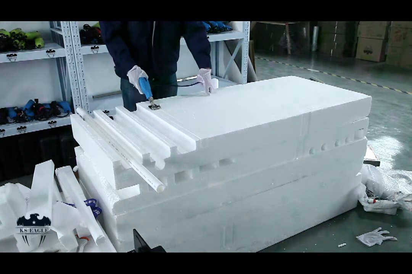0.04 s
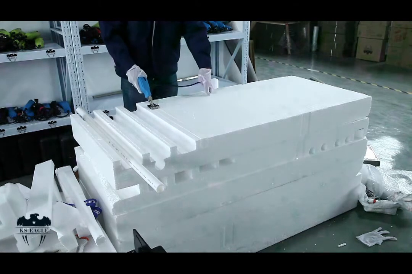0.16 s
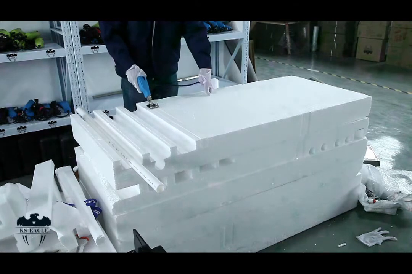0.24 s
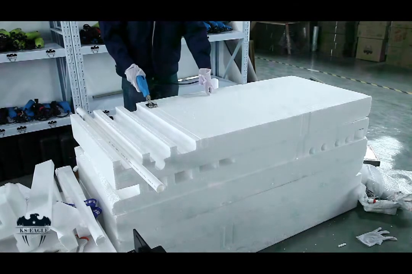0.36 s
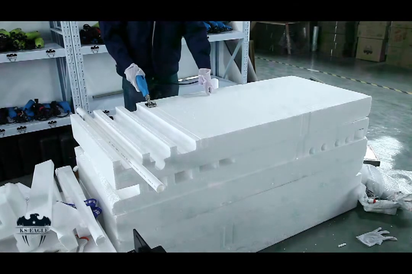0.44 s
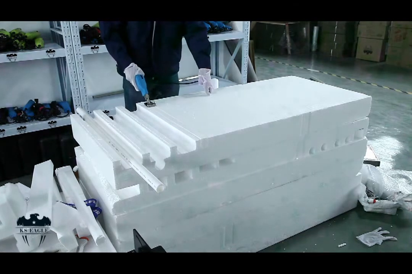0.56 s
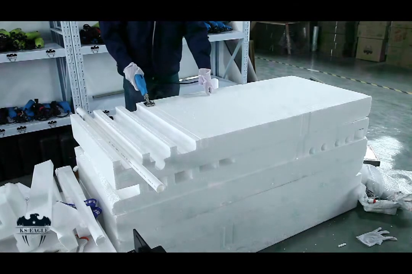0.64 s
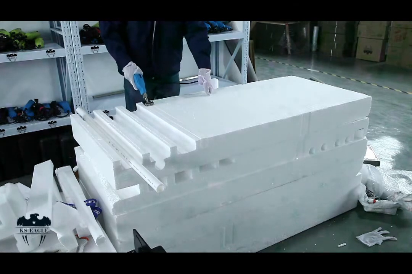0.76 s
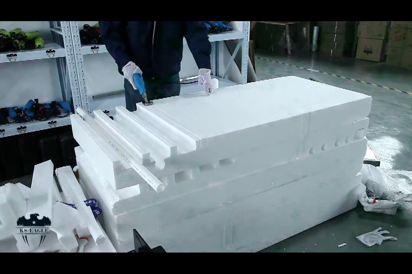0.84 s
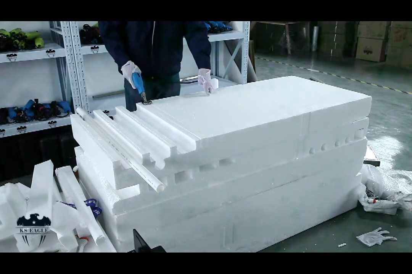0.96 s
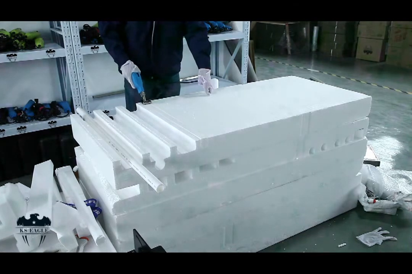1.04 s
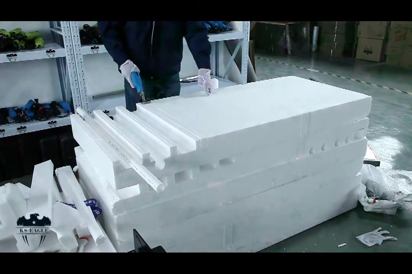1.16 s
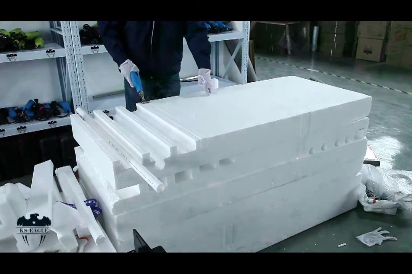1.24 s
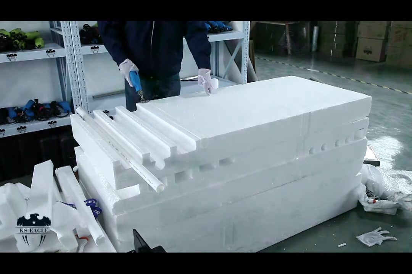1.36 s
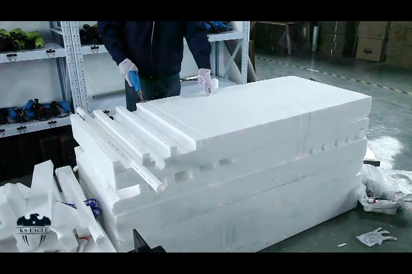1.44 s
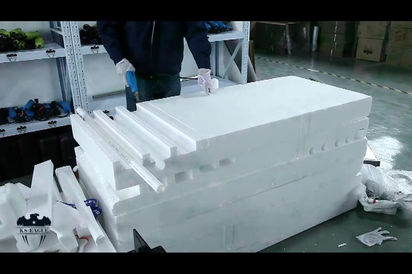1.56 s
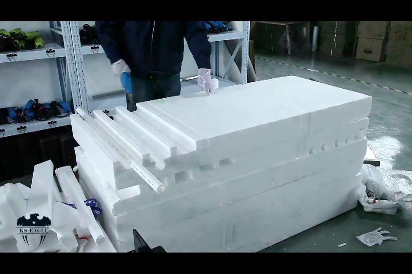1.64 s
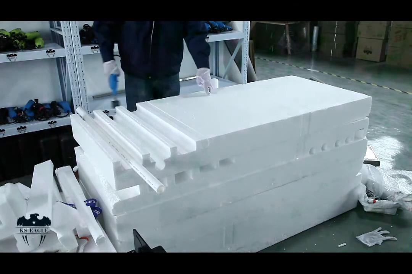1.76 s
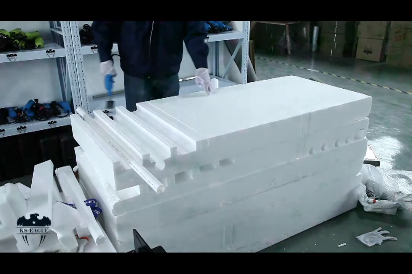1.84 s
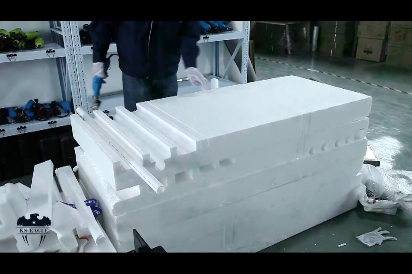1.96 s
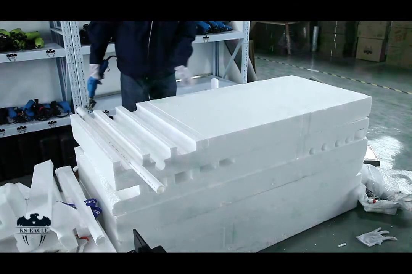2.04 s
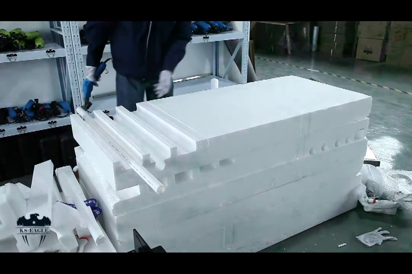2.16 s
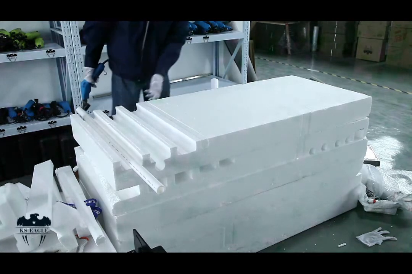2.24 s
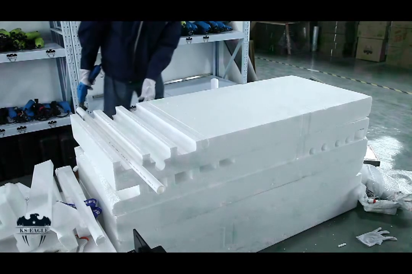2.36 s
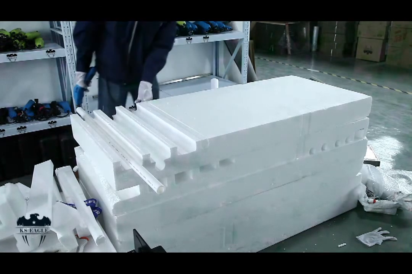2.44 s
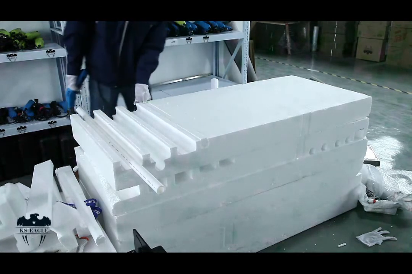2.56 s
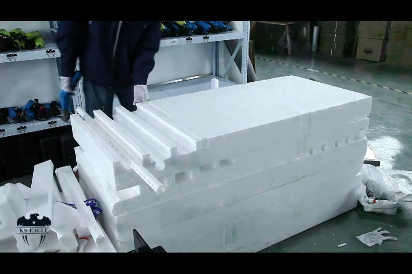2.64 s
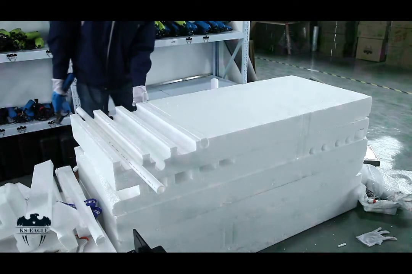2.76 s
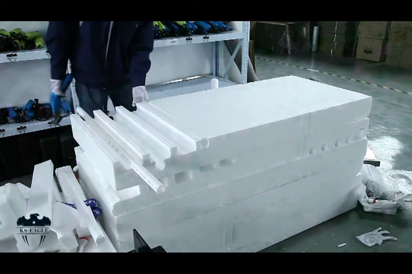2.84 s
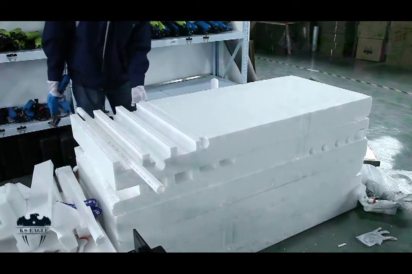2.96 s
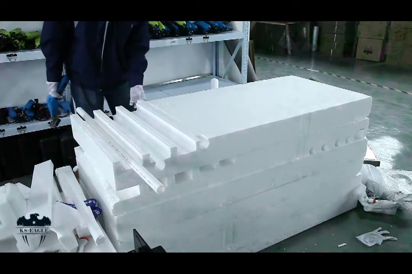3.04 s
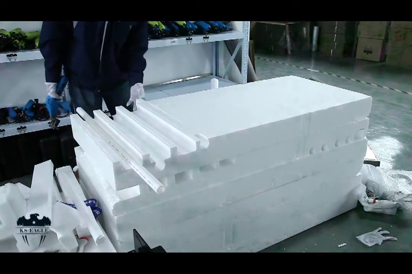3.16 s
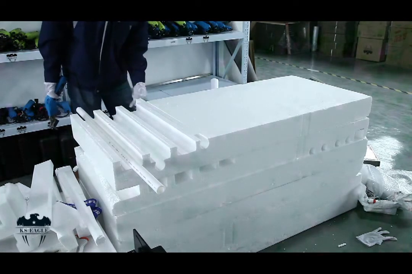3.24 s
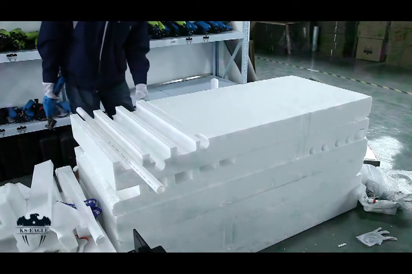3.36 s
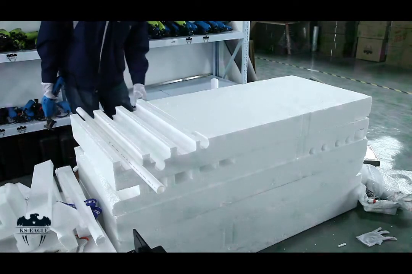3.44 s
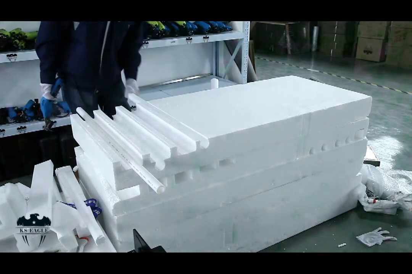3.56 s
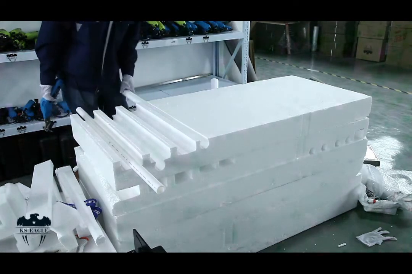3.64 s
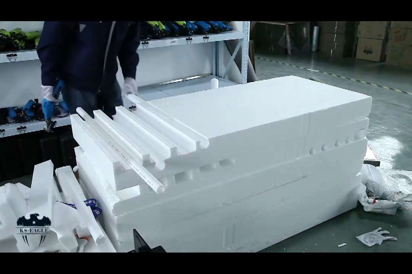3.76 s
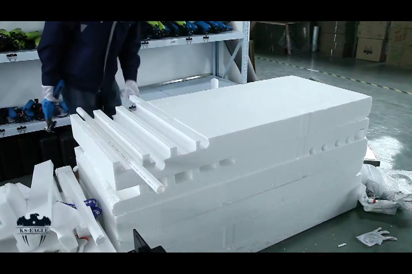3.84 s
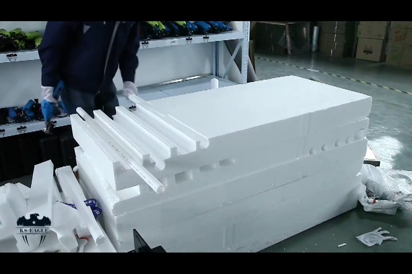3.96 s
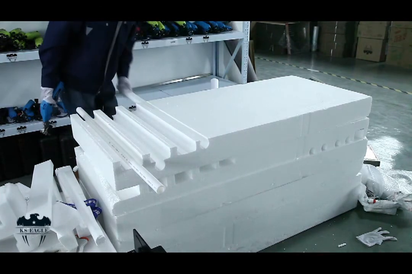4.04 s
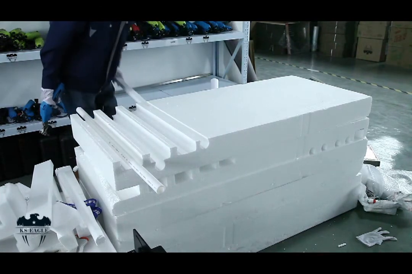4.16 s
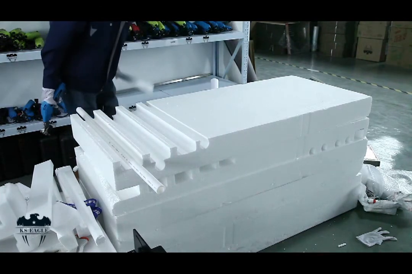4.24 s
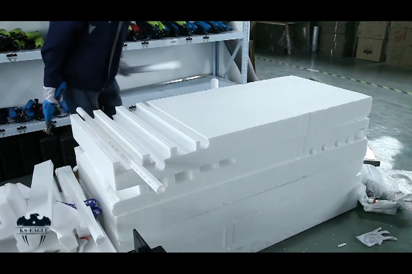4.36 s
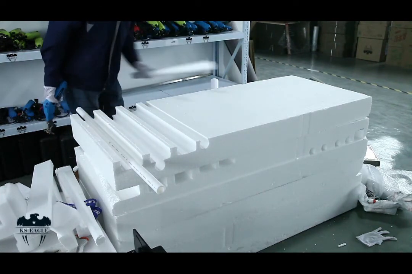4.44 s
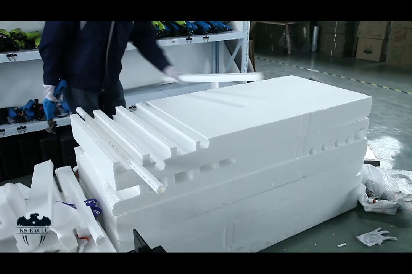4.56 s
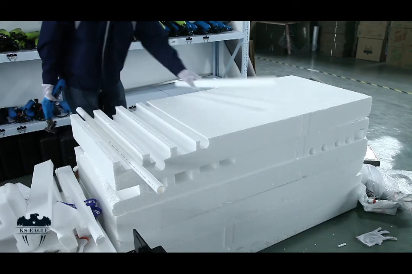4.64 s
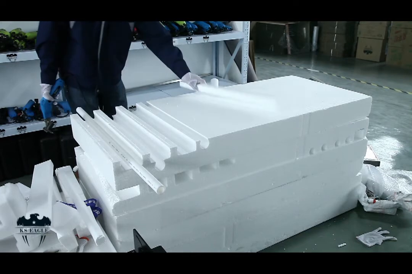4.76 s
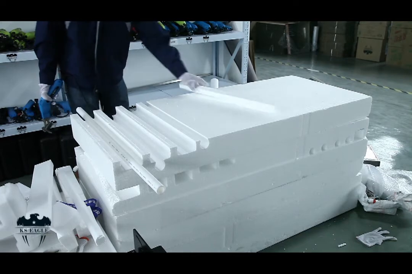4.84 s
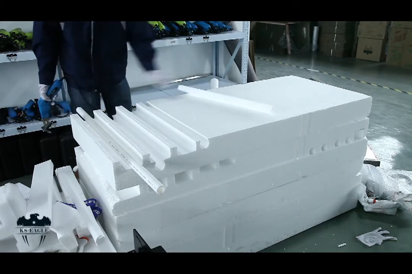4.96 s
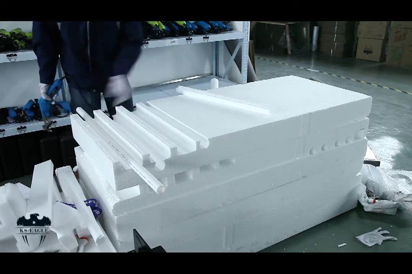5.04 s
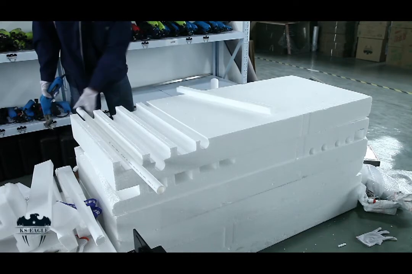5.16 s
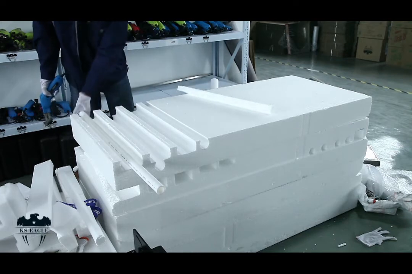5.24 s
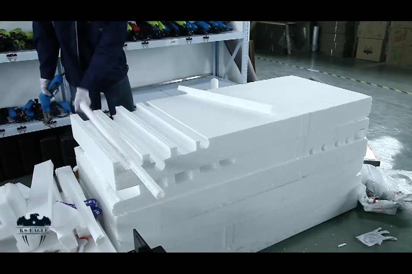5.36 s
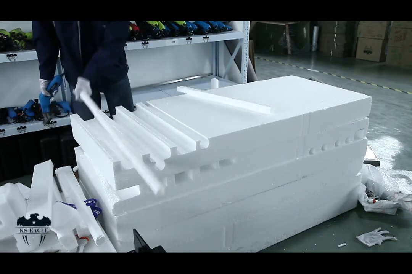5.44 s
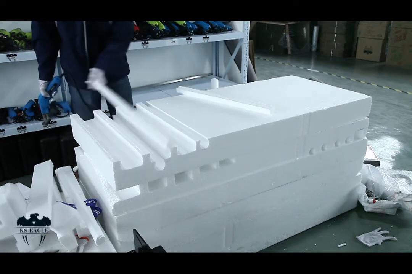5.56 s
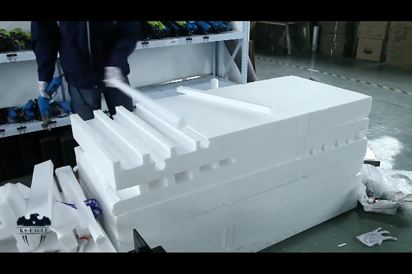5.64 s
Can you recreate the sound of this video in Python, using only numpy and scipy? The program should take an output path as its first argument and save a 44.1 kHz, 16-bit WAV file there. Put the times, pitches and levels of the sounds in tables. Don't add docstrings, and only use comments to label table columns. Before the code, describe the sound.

A hot blade cuts polystyrene with a thin sizzle, breathy whistle and small snags, slightly sped up. Sharp cracks and a squeak mark its exit, then the tool is set down with a soft knock. After faint rustles, a strip is pulled free in three loud, squeaky, crackling rasps. It drops and bounces lightly on the block; a glove brushes another. Hissy, reverberant warehouse, microphone fairly near, identical channels.

```python
import sys
import numpy as np
from scipy import signal
from scipy.fft import rfft, irfft
from scipy.io import wavfile
from scipy.ndimage import uniform_filter1d

SR = 44100
rng = np.random.default_rng(int(sys.argv[2]) if len(sys.argv) > 2 else 0)


def inscribe(sig):
    pcm = np.round(np.clip(np.atleast_2d(sig).T, -1, 1) * 32767)
    wavfile.write(sys.argv[1], SR, pcm.astype(np.int16))


def nominal_scale(level):
    x = np.asarray(level, float) / 20
    return 10 ** x


N = 251811
T = np.arange(N) / SR
SPLICE_S, FAST = 1.538, 1.605

# (frequency [Hz], level [dB rms])
HUM_LINES = [(150.7, -76), (301.5, -94.5), (656.8, -84.5)]
# (frequency [Hz], density [dB per Hz])
HALL_HISS = [(15, -79), (25, -13), (96, -5), (152, 0), (342, -2), (555, -6.5), (653, -6), (708, -7),
             (1430, -11.5), (3570, -10), (6280, -6.5), (7190, -13.5), (13000, -26), (15700, -29)]
HALL_HISS_DB = -67.5
# (frequency [Hz], t60 [s])
HALL_T60 = [(100, 0.97), (300, 1), (700, 0.76), (2000, 0.84), (6000, 0.6), (14000, 0.41)]
# (frequency [Hz], level [dB])
HALL_WET = [(100, 8.5), (2000, 3), (4000, 6.5), (6500, -7.5), (14000, 6)]

# (time [s], sizzle level [dB])
KNIFE_FEED = [(0.0, -54), (0.132, -54.5), (1.336, -54), (1.43, -50.5), (1.44, -59), (1.462, -60),
              (1.538, -57)]
# (frequency [Hz], density [dB per Hz])
SIZZLE_COLOUR = [(1760, -20.5), (3000, -8.5), (3240, -16), (3590, -6.5), (5520, -7.5), (9880, 0),
                 (11300, -0.5), (14600, -5.5), (15700, -16)]
# (time [s], centre [Hz])
JET_PATH = [(0, 10600), (.3, 11700), (.62, 10700), (.9, 10500), (1.14, 12000), (1.25, 9600), (1.538, 10400)]
JET_DB, JET_WIDTH_HZ = -3, 1500
# (frequency [Hz], density [dB per Hz])
GROOVE_COLOUR = [(180, -39), (300, -21), (380, -7.5), (427, -33), (498, -14), (645, -16), (1340, -11.5),
                 (5000, -7.5), (6500, -8.5), (11000, -120)]
# (multiple of the pitch, width [Hz], level [dB])
GROOVE_OVERTONES = [(1, 148, -1), (1.38, 225, -15)]
GROOVE_HZ, GROOVE_SAG_HZ_PER_S2, LEAVES_S = 1450, 100, 1.43
GROOVE_FULL_DB, GROOVE_START_DB, GROOVE_DEEPENS_S = -57, -10, 0.23
# (frequency [Hz], width [Hz], level [dB], strongest at [s])
GAP_WHISTLES = [(1170, 52, 0, .75), (1870, 125, 2, 1), (2280, 180, -4.5, 1.1), (2840, 156, 1.5, 1.25),
                (3160, 190, -3.5, 1.1), (3840, 140, -8, 1.7)]
GAP_DB, GAP_DB_PER_S = -60, 14
WHISTLE_PATCHY_DB, WHISTLE_PATCH_HZ = 0.8, 9.0
# (peak [s], level [dB], rise [s], fall [s], groove relative [dB])
SHOVES = [
    (.005, -56.5, 0.018, 0.086, -6),
    (.06, -58, 0.026, 0.017, -26),
    (.108, -56, 0.011, 0.014, -29),
    (.44, -53, 0.027, 0.049, -36),
    (1.431, -72, 0.0031, 0.037, -18),
    (1.455, -39, 0.016, 0.0042, -32),
    (1.4675, -33.5, 0.0035, 0.0096, -15),
    (1.49, -56.5, 0.016, 0.067, 5.5),
    (1.515, -47.5, 0.046, 0.0066, -18),
    (1.5295, -44, 0.0096, 0.012, -18),
]
# (time [s], peak [dB], t60 [s], groove relative [dB])
SNAGS = [(0.015, -34, 0.0072, -19), (0.027, -32, 0.016, -21), (0.0605, -45, 0.009, -24),
         (0.1036, -35, 0.037, -23.5), (0.432, -29.5, 0.022, -23), (1.436, -21, 0.008, -44),
         (1.4484, -30, 0.014, -44), (1.4534, -26, 0.014, -43), (1.4654, -57, 0.012, -18),
         (1.467, -23, 0.028, -45), (1.4834, -53, 0.012, -22), (1.501, -36, 0.0085, -9),
         (1.511, -42, 0.012, -24), (1.5279, -29, 0.012, -17)]
# (time [s], level [dB])
CRACKS = [
    (1.4363, -28),
    (1.4515, -30),
    (1.4543, -35),
    (1.468, -36),
    (1.4702, -22),
    (1.5295, -37),
]
# (start [s], end [s], first gap [s], last gap [s], level [dB])
STUTTERS = [
    (.0163, .0215, 0.001, .002, -36),
    (.0247, .0403, 0.0015, 0.0026, -35),
    (.0502, .0668, 0.0024, 0.0032, -37),
    (.1042, .1172, .002, .0017, -31.5),
    (.4183, .4246, .0062, .0062, -32),
    (.43, .4415, 0.0012, 0.0011, -32),
    (.4432, .4502, .0024, .0023, -32),
    (1.5012, 1.516, .004, 0.0033, -33),
]
# (frequency [Hz], level [dB], t60 [s])
BLADE_MODES = [(1500, -60, 0.1), (2300, -61, .08), (2790, -59, 0.11), (3300, -59, 0.08), (3080, -57, .12),
               (4030, -60, 0.054)]
BREAKOUT_S = 1.3

# (time [s], peak [dB], top of thud [Hz], t60 [s], floor thump relative [dB])
KNOCKS = [(0.495, -57, 284, 0.22, -5), (0.578, -70, 300, 0.067, -16), (1.466, -55.5, 1120, 0.29, 4),
          (1.7886, -50, 337, 0.11, -14), (2.549, -60, 302, 0.076, -2), (3.514, -50.5, 334, 0.21, -11),
          (3.846, -51, 310, 0.21, -36), (4.031, -49.5, 413, 0.23, -34), (4.759, -38.5, 970, 0.22, -34),
          (4.811, -38.5, 700, 0.058, -28), (4.889, -40, 740, 0.09, -30), (5.03, -49, 730, 0.044, -19),
          (5.277, -66, 192, 0.06, -3)]

# (frequency [Hz], density [dB per Hz])
SKIN_COLOUR = [(2060, -59.5), (3500, -7.5), (4800, -1.5), (6360, 5), (7200, 5), (8340, -2.5), (9190, -7.5),
               (10500, -24), (13600, -27), (22000, -120)]
# (frequency [Hz], density [dB per Hz])
BODY_COLOUR = [(90, -18), (150, -17), (350, -13), (600, -10.5), (950, -3.5), (1350, -5.5), (1850, -3.5),
               (2400, -3), (3400, -0.5), (4500, -17), (7700, -72.5)]
# (frequency [Hz], density [dB per Hz])
SHEEN_COLOUR = [(5880, -33), (10000, 3.5), (13500, -4), (14800, -14.5), (15700, -7.5)]
# (peak [s], level [dB], rise [s],
# fall [s], body relative [dB])
RUSTLES = [(1.541, -59, 0.016, 0.22, 1), (1.62, -56, 0.038, 0.23, -15), (1.8, -69.5, 0.026, 0.31, -4),
           (1.98, -71.5, 0.13, 0.029, -11), (2.04, -69, 0.058, 0.31, -32), (2.294, -66.5, 0.065, 0.17, -9),
           (2.755, -62.5, 0.0092, 0.16, -3.5), (2.79, -51.5, 0.03, 0.66, -28),
           (2.855, -56.5, 0.15, 0.0043, -2.5), (3.7, -49, 0.093, 0.08, -10.5),
           (3.774, -50.5, 0.057, 0.017, -15), (3.848, -45, 0.057, 0.03, -10.5),
           (4.148, -45, 0.012, 0.18, -11), (4.3, -60.5, 0.43, 1, -11), (4.596, -67, 0.0095, 0.011, -19),
           (4.72, -84, 0.014, .012, -24), (4.783, -53.5, 0.024, 0.033, 1), (4.82, -65, 0.022, 0.37, -14),
           (5.08, -72, 0.023, 0.18, -13), (5.15, -64.5, 0.082, 0.17, -7.5), (5.3, -63.5, 0.0098, 0.2, -2.5),
           (5.391, -60, 0.012, 0.02, -11), (5.585, -67, 0.29, 0.22, -8.5)]
RUSTLE_SHEEN_DB = -23
# (peak [s], level [dB], rise [s], fall [s], unused)
SLEEVE = [
    (1.542, -73, .004, 0.11, 0),
    (2.53, -71.5, 0.018, 0.11, 0),
    (5.26, -70, .04, .05, 0),
    (1.608, -61, .004, 0.016, 0),
    (1.93, -78.5, 0.5, 0.31, 0),
    (4.5, -77.5, 0.17, 0.54, 0),
    (5.1, -88, 0.2, .2, 0),
]
# (time [s], pressure as rasp level [dB])
PULLS = [
    [(2.85, -63), (2.862, -47.5), (2.912, -39.5), (2.945, -41.5), (2.965, -39.5), (3.008, -43.5),
     (3.058, -38), (3.088, -40.5), (3.119, -49.5)],
    [(3.388, -46), (3.398, -43), (3.486, -40.5), (3.498, -35.5), (3.53, -42), (3.59, -39), (3.652, -47),
     (3.662, -50), (3.68, -56)],
    [(3.875, -55), (3.92, -46.5), (3.95, -41.5), (4.02, -37.5), (4.04, -39), (4.125, -35.5), (4.14, -43),
     (4.17, -70)],
]
# (frequency [Hz], width [Hz], level over rasp [dB])
PULL_RINGS = [
    [(920, 85, -25), (1750, 130, -7), (1900, 490, -4), (2450, 110, -7), (6190, 160, 14.5)],
    [(930, 110, -14), (1190, 97, -8), (1680, 83, -1), (2390, 49, -12), (4360, 320, -9)],
    [(930, 81, -7.5), (1150, 24, -6), (2030, 230, -17), (3160, 91, -29), (7200, 160, 4)],
]
PULL_SHEEN_DB = (-11.5, -14.5, -10)
SHEEN_PER_DB, FIRM_DB = 0.4, -36.5
PULL_BODY_DB, BODY_PER_DB = -14, -0.1
# (time [s], peak [dB], t60 [s], body relative [dB])
SLIPS = [(1.605, -36, 0.03, -23), (1.791, -62, 0.049, -31), (2.4917, -53, 0.038, -28),
         (2.519, -43, 0.028, -14), (2.5277, -45.5, 0.041, -13.5), (2.539, -43, 0.037, -20),
         (2.55, -52, 0.18, -16), (2.651, -46, 0.047, -38), (2.7247, -54, 0.019, -27),
         (2.7686, -62, 0.026, -23), (2.7822, -37, 0.015, -22), (2.8022, -39, 0.041, -12),
         (2.8326, -39, .03, -17), (2.8558, -37, 0.032, -30), (2.871, -38, .03, -35),
         (2.8904, -33, .03, -32), (2.905, -27, 0.04, -32), (2.9544, -28, 0.051, -27),
         (2.98, -28, 0.024, -38), (3.079, -23, .02, -24), (3.3957, -32, 0.05, -17),
         (3.455, -27.5, 0.016, -15.5), (3.4955, -44, .03, -22), (3.559, -26, 0.056, -29),
         (3.8973, -36, 0.036, -13), (3.9272, -37, 0.037, -30), (3.995, -34, 0.017, -22),
         (4.0175, -26, 0.036, -20), (4.034, -36, .02, -22), (4.051, -27, 0.039, -15),
         (4.156, -45.5, .03, -19), (3.014, -43.5, 0.03, -31), (3.043, -24, 0.051, -40),
         (3.374, -42, 0.036, -17), (3.377, -42, 0.03, -14), (3.4062, -27, 0.035, -29),
         (3.4274, -44, 0.03, -27), (3.5835, -28, 0.047, -39), (3.659, -27.5, 0.027, -39),
         (3.773, -42, 0.029, -30), (3.845, -32.5, 0.026, -25), (4.1228, -26.5, 0.024, -19),
         (4.693, -51, 0.02, -24), (4.7618, -37, 0.052, -13), (5.2205, -46, 0.02, -11),
         (5.386, -53, 0.03, -20)]
# (time [s], peak [dB])
TICKS = [(1.5791, -34), (1.7906, -36.5), (1.928, -56), (1.944, -63), (1.9694, -49), (1.9754, -54),
         (2.4922, -55), (2.5034, -48), (2.521, -36.5), (2.5404, -40), (2.6654, -42), (2.7257, -50),
         (2.7686, -46), (2.7826, -43), (2.806, -51), (2.8234, -39), (3.7449, -48), (4.6957, -60),
         (4.7631, -40), (4.9744, -46)]
# (start [s], end [s], first gap [s], last gap [s], level [dB])
JUDDERS = [
    (2.6505, 2.655, .002, .002, -52),
    (2.7955, 2.823, 0.004, .007, -46),
    (2.8315, 2.835, .0025, 0.0025, -44),
    (5.221, 5.283, 0.007, .006, -48.5),
]
# (time [s], level [dB])
POPS = [(2.8623, -30.7), (2.8733, -24), (2.8787, -27), (2.8894, -23), (2.892, -21), (2.9059, -22.9),
        (2.9096, -32), (2.9181, -33), (2.9251, -31), (2.9285, -27.3), (2.9393, -29), (2.982, -24.4),
        (2.9849, -33), (3.0151, -25.1), (3.0379, -37), (3.0471, -32), (3.0799, -25), (3.0824, -25.1),
        (3.0862, -33), (3.0934, -34), (3.1077, -34), (3.1137, -26), (3.3791, -35), (3.391, -35),
        (3.3966, -25), (3.4081, -23.5), (3.4799, -32), (3.4944, -34), (3.4976, -37), (3.5021, -34),
        (3.5083, -30), (3.5154, -28.0), (3.5226, -28.9), (3.5612, -27.5), (3.5702, -27.9), (3.5846, -33),
        (3.5876, -19), (3.5898, -24), (3.6178, -24), (3.6618, -32), (3.9912, -36), (3.9966, -29),
        (4.0111, -28), (4.0205, -26.8), (4.0246, -21), (4.0344, -28), (4.0463, -27.2), (4.0513, -30),
        (4.0575, -29), (4.0658, -22), (4.0754, -20), (4.0861, -21), (4.1037, -23), (4.1111, -25.0),
        (4.1148, -24), (4.1246, -21), (4.1297, -24.7), (4.1364, -24)]
POP_DB = 3
# (peak [s], level [dB], rise [s], fall [s], unused)
FREED = [
    (3, -44, .15, .3, 0),
    (6.6, -47, 0.059, .1, 0),
]
FREED_HZ, FREED_WIDTH_HZ = 1160, 21
GRAIN_TOP = 3.5

SQUEAK_S = (1.580, 1.589, 1.594, 1.5975)
SQUEAK_RATE_HZ = (650, 1450, 1500, 1150)
# (frequency [Hz], density [dB per Hz])
SQUEAK_COLOUR = [(470, -46), (900, -17), (2100, -6.5), (3050, -2), (3700, -6), (4800, -0.5), (6300, -2),
                 (7300, 5), (8300, -6), (10800, -12), (15000, -39)]
SQUEAK_DB = -26

# (frequency [Hz], level [dB], t60 [s])
SHELF_MODES = [(80, -63, 0.082), (188, -57, 0.092), (387, -51.5, 0.097), (270, -59.5, 0.12),
               (444, -50, 0.037), (643, -62, 0.071), (920, -63, .06)]
TOOL_DOWN_S = 1.7895
# (time [s], level [dB], upper modes relative [dB])
LANDINGS = [(4.7605, -43, -18), (4.7645, -38, -10), (4.772, -34.5, -16), (4.7855, -30.5, 13),
            (4.7871, -32.5, 13), (4.797, -51, -10), (4.811, -48, -16), (4.831, -35, -12), (4.886, -39, -18),
            (4.893, -42, -18), (4.93, -37, -13), (4.956, -47, -16)]
# (frequency [Hz], level [dB], t60 [s])
STRIP_MODES = [(274, -1, 0.038), (395, -7, 0.064), (620, -1, 0.11), (750, -10, 0.071), (920, -2, 0.073),
               (1150, -1, 0.033), (1520, 0, 0.022), (2130, 8, 0.0011), (3600, 7, 0.00079)]
# (frequency [Hz], level [dB], t60 [s])
BLOCK_MODES = [(618.7, -44.5, 0.28), (774, -39, 0.053), (1071, -48, 0.31), (1168, -43.5, 0.15),
               (1304, -50, .2), (199, -56.5, 0.25)]
# (time [s], level [dB])
BRUSH = [(5.212, -59), (5.223, -57), (5.25, -49.5), (5.281, -52), (5.288, -65), (5.31, -75)]
# (frequency [Hz], density [dB per Hz])
GLOVE_COLOUR = [(880, -61), (1500, -20), (2500, -11), (3500, -13), (4120, -5), (5670, -0.5), (8660, -9.5),
                (13200, -42), (15000, -51)]

# (filter side, edge [Hz], level under the whole [dB])
WEAK_BANDS = [("low", 82, -42.5)]
MASK_FROM_HZ, MASK_DB, MASK_DB_PER_KHZ, MASK_RELEASE_DB_PER_S = 11000, -54.5, 1.2, 75
MASK_BASS_HZ, MASK_BASS_SHARE, TOP_HZ = 2000, 0.2, 15800


def rms_one(x):
    return x / np.sqrt(np.mean(x ** 2) + 1e-20)


def in_time(rows):
    s, value = np.transpose(rows)
    return np.interp(T, s, value)


def at_hz(points, hz):
    point_hz, db = np.transpose(points)
    return np.interp(np.log(hz + 1), np.log(point_hz), db)


def bandpass(x, low_hz, high_hz):
    return signal.sosfilt(signal.butter(2, [low_hz, high_hz], "band", fs=SR, output="sos"), x)


def convolve(x, response):
    return signal.fftconvolve(x, response)[:N]


def colour(x, spectrum):
    cepstrum = irfft(np.log(nominal_scale(at_hz(spectrum, np.linspace(0, SR / 2, 2049)))))
    cepstrum[1:2048] *= 2
    cepstrum[2049:] = 0
    response = irfft(np.exp(rfft(cepstrum)))
    return convolve(x, response / np.linalg.norm(response))


def drift(rate_hz):
    r = np.exp(-2 * np.pi * rate_hz / SR)
    return rms_one(signal.lfilter([1], [1, -2 * r, r * r], rng.standard_normal(N + SR))[SR:])


def grains(per_s, spread_db, clump_db, clump_hz):
    sizes = nominal_scale(spread_db * np.minimum(rng.exponential(1, N), 4)) * rng.standard_normal(N)
    hits = rng.random(N) < per_s / SR
    return rms_one(sizes * hits * nominal_scale(clump_db * drift(clump_hz)))


def clicks(rows):
    out = np.full(N, 1e-18)
    out[[round(s * SR) for s, db in rows]] = nominal_scale(np.array(rows)[:, 1])
    return out


def stutter(rows, chance, uneven_db):
    slips = []
    for start, end, first, last, db in rows:
        count = max(round(2 * (end - start) / (first + last)), 1)
        gaps = np.linspace(first, last, count)
        s = start + np.append(0, np.cumsum(gaps)) * (end - start) / gaps.sum()
        edge = abs(np.linspace(-1, 1, count + 1))
        slips += zip(s, db - 5.5 * edge ** 2 + uneven_db * chance[(s * SR).astype(int)])
    return clicks(slips)


def bursts(rows, relative=0):
    out = np.zeros(N)
    for s, db, t60, share_db in rows:
        start = round(s * SR)
        stop = min(start + round(t60 * SR) + 1, N)
        out[start:stop] += nominal_scale(db + relative * share_db - 60 * T[:stop - start] / t60)
    return out


def swells(rows, relative=0):
    out = 0
    for s, db, rise, fall, share_db in rows:
        away_db = 20 * np.maximum((s - T) / rise, (T - s) / fall)
        out = out + nominal_scale(db + relative * share_db - away_db)
    return out


def peak(x, hz, width_hz):
    return signal.lfilter(*signal.iirpeak(hz, hz / width_hz, SR), x)


def resonate(x, hz, width_hz):
    out, state, r = np.zeros(N), np.zeros(2), np.exp(-np.pi * width_hz / SR)
    zeros = [(1 - r * r) / 2, 0, (r * r - 1) / 2]
    for i in range(0, round(SPLICE_S * SR), 256):
        poles = [1, -2 * r * np.cos(2 * np.pi * hz[i] / SR), r * r]
        out[i:i + 256], state = signal.lfilter(zeros, poles, x[i:i + 256], zi=state)
    return out


def ring(blows, hz, t60_s):
    r, w = nominal_scale(-60 / (t60_s * SR)), 2 * np.pi * hz / SR
    return signal.lfilter([0, np.sin(w)], [1, -2 * r * np.cos(w), r * r], blows)


def struck(s, modes):
    return sum((-1) ** k * ring(clicks([(s, db)]), hz, t60) for k, (hz, db, t60) in enumerate(modes))


def hall(x, wet_db, speed):
    t, tail = T[:round(1.3 * SR)], 0
    for low in 60 * 2 ** np.arange(0, 8, 0.5):
        band = bandpass(rng.standard_normal(len(t)), low, low * np.sqrt(2))
        decay = nominal_scale(-60 * t * speed / at_hz(HALL_T60, low * 1.2 / speed))
        tail = tail + band * decay * nominal_scale(at_hz(HALL_WET, low / speed))
    tail = tail * np.clip(t * speed / 0.01, 0, 1)
    return x + nominal_scale(wet_db - 36.5) * np.sqrt(speed) * convolve(x, tail)


def background(speed):
    spectrum = [(hz * speed, db) for hz, db in HALL_HISS]
    out = nominal_scale(HALL_HISS_DB - 2.5 + 0.14 * drift(9.3)) * colour(rng.standard_normal(N), spectrum)
    for hz, db in HUM_LINES:
        out = out + nominal_scale(db + 3 + 0.11 * drift(0.3)) * np.sin(2 * np.pi * hz * speed * T)
    return out


def sizzle():
    fizz = colour(grains(20000, 0.24, 0.4, 57), SIZZLE_COLOUR)
    feed = nominal_scale(in_time(KNIFE_FEED)) + swells(SHOVES)
    jet = resonate(fizz, in_time(JET_PATH), JET_WIDTH_HZ)
    return feed * nominal_scale(-4) * (fizz + nominal_scale(JET_DB) * jet)


def groove():
    pitch_hz = GROOVE_HZ - GROOVE_SAG_HZ_PER_S2 * T ** 2 * (T < LEAVES_S)
    deepening_db = GROOVE_START_DB * np.exp(-T / GROOVE_DEEPENS_S)
    depth = nominal_scale(GROOVE_FULL_DB + deepening_db - 7.4 * (T > LEAVES_S))
    breath, draught = rng.standard_normal(N), rng.standard_normal(N)
    whistle, gaps = 0, 0
    for multiple, width_hz, db in GROOVE_OVERTONES:
        gain = nominal_scale(db + 16.5 + WHISTLE_PATCHY_DB * drift(WHISTLE_PATCH_HZ))
        whistle = whistle + gain * resonate(breath, multiple * pitch_hz, width_hz)
    for hz, width_hz, db, top_s in GAP_WHISTLES:
        patchy_db = WHISTLE_PATCHY_DB * drift(WHISTLE_PATCH_HZ)
        gain = nominal_scale(db + 12 - GAP_DB_PER_S * abs(T - top_s) + patchy_db)
        gaps = gaps + gain * peak(draught, hz, width_hz)
    level = (depth + swells(SHOVES, 1)) * nominal_scale(-8)
    return level * (colour(breath, GROOVE_COLOUR) + whistle) + nominal_scale(GAP_DB) * gaps


def snags():
    noise = rng.standard_normal(N)
    dry_slips = clicks(CRACKS) + stutter(STUTTERS, noise, 1.9)
    bright = nominal_scale(-40) * noise * bursts(SNAGS) + signal.lfilter([0.65, 0.65], [1], dry_slips)
    return colour(bright, SIZZLE_COLOUR) + colour(noise * bursts(SNAGS, 1), GROOVE_COLOUR)


def knocks():
    out, noise = np.zeros(N), rng.standard_normal(N)
    for s, db, hz, t60, thump_db in KNOCKS:
        rattle = nominal_scale(-9.5) * noise * bursts([(s, db, t60, 0)]) * np.sqrt(SR / hz / 2)
        blow = rattle + nominal_scale(-7.5) * clicks([(s + 0.0031, db)]) * SR / hz
        out += bandpass(blow, hz / 2.28, hz * 1.48) + nominal_scale(thump_db + 2.5) * bandpass(blow, 60, 230)
    return out


def beads():
    out, shared = 0, drift(130)
    for low in 120 * 2 ** np.arange(0, 7.2, 0.75):
        out = out + bandpass(grains(14000, 0.39, 1.2, 120), low, min(low * 2 ** 0.75, 19000))
    return rms_one(np.tanh(rms_one(out * nominal_scale(0.3 * shared)) / GRAIN_TOP))


def strip():
    skin, body, rubbing, rings = swells(RUSTLES), swells(RUSTLES, 1), beads(), 0
    sheen = skin * nominal_scale(RUSTLE_SHEEN_DB) + swells(SLEEVE)
    for pull, sheen_db, modes in zip(PULLS, PULL_SHEEN_DB, PULL_RINGS):
        rasp_db = in_time(pull)
        inside_s = np.minimum(T - pull[0][0], pull[-1][0] - T)
        touching = np.clip(inside_s / 0.004 + 0.5, 0, 1) * nominal_scale(rasp_db - 1)
        firmness_db = rasp_db - FIRM_DB
        skin = skin + touching
        body = body + touching * nominal_scale(PULL_BODY_DB + 0.5 + BODY_PER_DB * firmness_db)
        sheen = sheen + touching * nominal_scale(sheen_db + SHEEN_PER_DB * firmness_db)
        for hz, width_hz, db in modes:
            rings = rings + nominal_scale(db) * peak(rubbing * touching + 1e-18, hz, width_hz)
    rings = rings + peak(rubbing * swells(FREED), FREED_HZ, FREED_WIDTH_HZ)
    snap = rng.standard_normal(N)
    slips = snap * signal.lfilter([0.04], [1, -0.96], bursts(SLIPS))
    ticks = signal.lfilter([0.25, 0.5, 0.25], [1], clicks(TICKS) + stutter(JUDDERS, snap, 2))
    skin_drive = rubbing * skin + nominal_scale(-7.5) * slips + nominal_scale(4.5) * ticks + nominal_scale(POP_DB) * clicks(POPS)
    sheen_drive = rubbing * sheen + nominal_scale(-25) * slips + nominal_scale(2) * ticks
    body_drive = rubbing * body + snap * bursts(SLIPS, 1)
    out = colour(skin_drive, SKIN_COLOUR) + colour(sheen_drive, SHEEN_COLOUR)
    return out + colour(body_drive, BODY_COLOUR) + rings


def squeak():
    span = (T >= SQUEAK_S[0]) * (T < SQUEAK_S[-1])
    rate_hz = np.interp(T, SQUEAK_S, SQUEAK_RATE_HZ) * (1 + 0.07 * drift(900))
    slips = np.diff(np.floor(0.6 + np.cumsum(span * rate_hz) / SR), prepend=0)
    return nominal_scale(SQUEAK_DB) * colour(slips * nominal_scale(0.97 * rng.standard_normal(N)), SQUEAK_COLOUR)


def landing():
    out, (s, db, hard_db) = np.zeros(N), np.transpose(LANDINGS)
    chance = rng.standard_normal((len(s), len(STRIP_MODES)))
    for (hz, mode_db, t60), uneven in zip(STRIP_MODES, chance.T):
        blow_db = db + mode_db - 15 + 2.4 * uneven + hard_db * (hz > 2000)
        out += ring(clicks(np.transpose([s, blow_db])), hz, t60)
    return bandpass(out, 200, 5000)


def brush():
    touching = (T > BRUSH[0][0]) * (T < BRUSH[-1][0])
    swish = grains(20000, 0.88, 0.84, 120) * touching * nominal_scale(in_time(BRUSH) + 1)
    return colour(swish, GLOVE_COLOUR)


def scene():
    fast = np.clip((SPLICE_S - T) / 0.003, 0, 1)
    thuds = knocks() + landing()
    thuds = thuds - struck(TOOL_DOWN_S, SHELF_MODES) + struck(LANDINGS[0][0], BLOCK_MODES)
    cutting = sizzle() + groove() + snags() + struck(BREAKOUT_S, BLADE_MODES)
    before = hall(cutting, -7, FAST) + hall(thuds * fast, -5, FAST) + background(FAST)
    handling = strip() + squeak() + brush()
    after = hall(handling, -6.5, 0.86) + hall(thuds, -3.5, 0.85) + background(1)
    return np.tile(fast * before + (1 - fast) * after, (2, 1))


def masked(x):
    hz, s, lines = signal.stft(x, SR, nperseg=2048)
    power, fall_db = abs(lines) ** 2, MASK_RELEASE_DB_PER_S * s
    loud = np.where(hz < MASK_BASS_HZ, MASK_BASS_SHARE, 1) @ power
    held_db = np.maximum.accumulate(10 * np.log10(loud + 1e-20) + fall_db) - fall_db
    limit_db = held_db + MASK_DB + MASK_DB_PER_KHZ * (hz[:, None] - 13000) / 1000
    weak = uniform_filter1d(power, size=5, axis=0) < nominal_scale(2 * limit_db)
    lines[(weak & (hz[:, None] > MASK_FROM_HZ)) | (hz[:, None] > TOP_HZ)] = 0
    return signal.istft(lines, SR, nperseg=2048)[1][:N]


def band_limit(x):
    return signal.sosfilt(signal.butter(12, 15860, fs=SR, output="sos"), x)


def record(dry):
    out, whole = dry[0].copy(), uniform_filter1d(dry[0] ** 2, size=2048)
    for side, edge_hz, under_db in WEAK_BANDS:
        band = signal.sosfiltfilt(signal.butter(6, edge_hz, side, fs=SR, output="sos"), out)
        dropped = uniform_filter1d(band ** 2, size=2048) < whole * nominal_scale(2 * under_db)
        out -= band * uniform_filter1d(dropped * 1.0, size=1024)
    return band_limit(np.tile(masked(out), (2, 1)))


dry = scene()
out = record(dry)
inscribe(out)
```